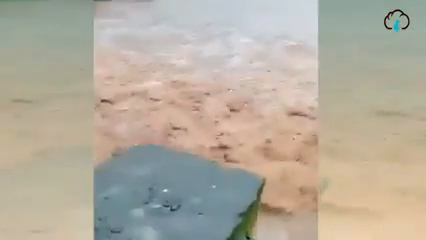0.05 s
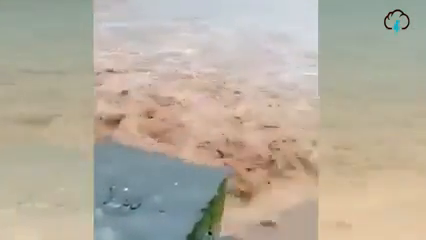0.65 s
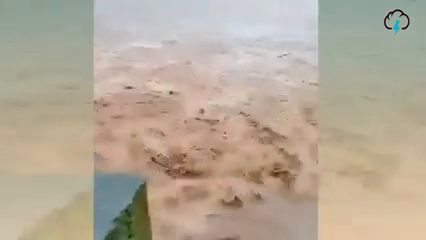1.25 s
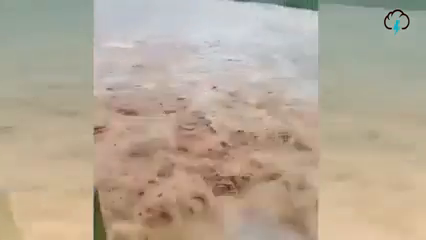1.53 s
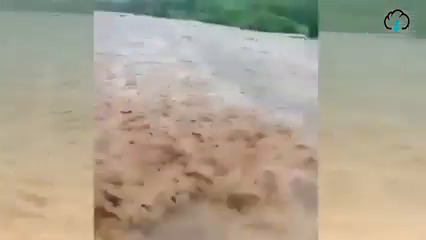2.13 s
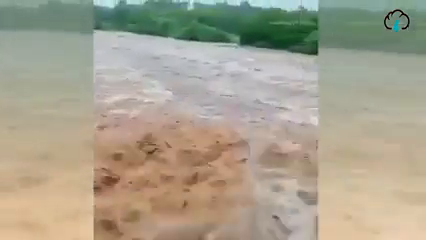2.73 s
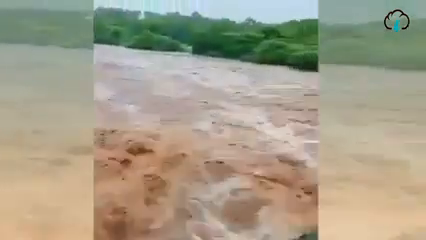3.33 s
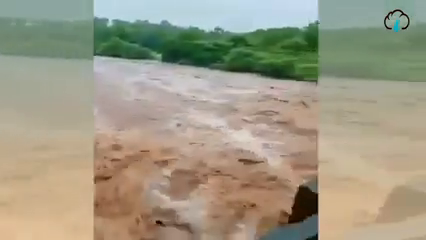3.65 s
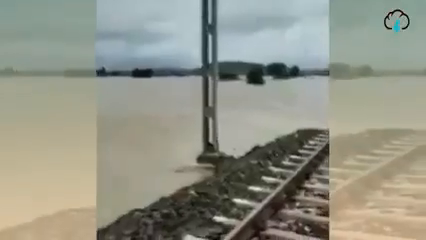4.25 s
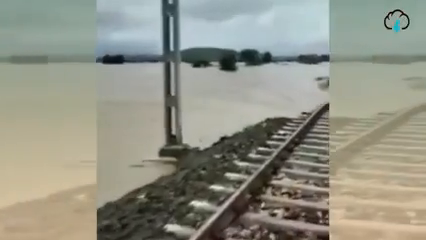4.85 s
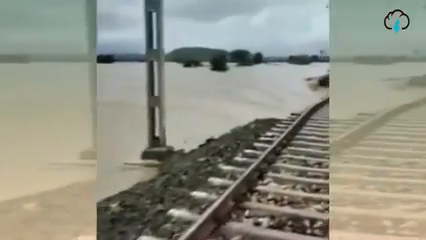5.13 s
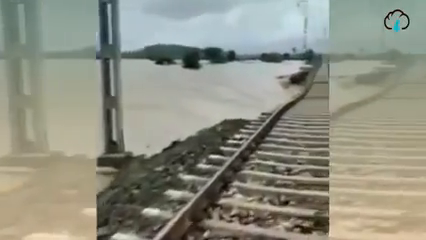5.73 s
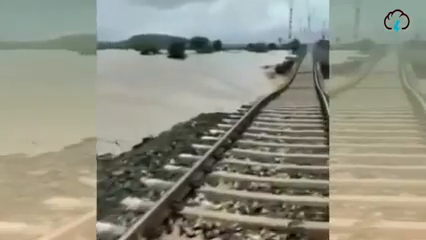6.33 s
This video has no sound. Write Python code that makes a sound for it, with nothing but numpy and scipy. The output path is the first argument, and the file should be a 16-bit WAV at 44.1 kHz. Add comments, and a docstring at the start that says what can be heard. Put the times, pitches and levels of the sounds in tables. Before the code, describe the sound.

Loud floodwater rushes nearby, surging and frothing as waves fold over and pockets of air gulp under. A little past halfway the roar breaks off into a brief hush with a faint hum. The rest is a quieter flooded plain: one sharp click of a stone, wind rumbling unevenly on the microphone under a flickering high hiss, and a few gentle laps of water.

```python
"""A river in flood tumbles over a drop close by: churning water, a bubbly wash, a bright hiss.
Waves fold over and air pockets gulp under. The roar breaks off into a short hush with a faint hum.
Then wind blows over a flooded plain beside a railway bank, buffeting the microphone;
small waves lap, and a ballast stone clicks once."""
import sys
import numpy as np
from scipy import signal
from scipy.fft import rfft, irfft, next_fast_len
from scipy.io import wavfile
from scipy.ndimage import uniform_filter1d, map_coordinates

SR = 44100
rng = np.random.default_rng(int(sys.argv[2]) if len(sys.argv) > 2 else 0)


def transcribe(u):
    """Save the signal u as a 16-bit wav file named by the first command-line argument.

    u: samples, shape (n,) or (channels, n), limited to [-1, 1]; the rate is SR.
    q: integer samples, one column per channel.
    """
    v = np.clip(np.atleast_2d(u).T, -1, 1)
    q = np.round(v * 32767).astype(np.int16)
    wavfile.write(sys.argv[1], SR, q)


N = 290619
TORRENT_END_S, WIND_START_S = 3.883, 4.04


def torrent():
    """Plunging water: churn, wash and bright hiss swell and surge together, then stop dead."""
    # torrent strength: time_s, level_db
    flow = [(0, -15), (1.5, -14.5), (1.75, -13), (2.0, -15), (2.8, -14), (3.0, -16), (3.1, -15), (3.3, -14),
            (3.42, -12.5), (3.54, -15.5), (3.88, -13)]
    mean_db, swell_db = swings(flow)
    surge = wobble(rate_hz=22)
    water = (amp(-3.5 + 0.89 * swell_db + 0.86 * surge) * churn()
             + amp(-4.5 + 0.44 * swell_db + 0.5 * surge) * wash()
             + amp(-13.5 + 0.1 * swell_db + 0.5 * surge) * bright_hiss()
             + sizzle() + hollow())
    past_s = np.maximum(clock() - TORRENT_END_S, 0)
    cutoff = np.where(past_s > 0, amp(-14 - 60 * past_s / 0.073), 1)  # faint, short trail
    return low_passed(water * amp(mean_db) * cutoff, top_hz=13200)


def churn():
    """The body of the water: low, lumpy noise and large bubbles."""
    # churn spectrum: freq_hz, gain_db
    colour = [(25, -27), (40, -18.5), (60, -10), (85, -1.5), (140, -6), (290, -2.5), (440, -4.5),
              (620, -13.5), (1200, -35.5)]
    boil = bubbles(count=2200, low_hz=112.7, high_hz=592, cycles=19.3, spread_db=1, rise=0.21)
    lumps = patchy(depth_db=1.6, width_hz=140, life_s=0.026) + amp(-11) * boil
    return coloured(evened(lumps, width_hz=150, span_s=.13), colour)


def wash():
    """Air folded into the water rings as a froth of small bubbles."""
    # wash spectrum: freq_hz, gain_db
    colour = [(250, -28), (450, 0), (700, 1), (900, -2), (1080, -2), (1450, -3.5), (2100, -3.5), (2700, -8),
              (3700, -8.5), (4400, -16.5), (5200, -43), (8000, -65)]
    froth = bubbles(count=4000, low_hz=694.3, high_hz=4447, cycles=170, spread_db=2, rise=0.046)
    foam = patchy(depth_db=3.5, width_hz=90, life_s=.04) + amp(-12.5) * froth
    return coloured(evened(foam, width_hz=840, span_s=.12), colour)


def bright_hiss():
    """A bright hiss that flickers in patches, wider in stereo than the low roar."""
    # bright hiss spectrum: freq_hz, gain_db
    colour = [(3000, -66), (4500, -4), (5200, -8.5), (6000, -0.5), (6800, 4.5), (7700, -0.5), (8800, -7.5),
              (11300, -7.5), (12800, -0.5), (13300, -11)]
    pair = [patchy(depth_db=4.5, width_hz=250, life_s=.022) for _ in range(2)]
    return coloured(widened(pair), colour)


def sizzle():
    """Brief sizzling swells in the treble hiss."""
    # swells, relative to the torrent: centre_s, level_db
    sizzles = [(.06, -22), (.37, -17), (.7, -26), (.85, -18), (1.44, -14), (1.61, -15.5), (1.88, -15),
               (2.11, -13), (2.24, -19), (2.68, -29), (2.93, -22), (3.33, -15), (3.58, -15), (3.82, -12.5)]
    # sizzle spectrum: freq_hz, gain_db
    colour = [(4500, -43), (5700, -1), (6300, -2), (6900, 8), (7600, -4), (8600, -12), (13000, -13)]
    pair = [patchy(depth_db=3, width_hz=150, life_s=0.031) for _ in range(2)]
    return swells(sizzles, half_s=0.04) * coloured(widened(pair), colour)


def sloshes():
    """Waves fold over in the torrent: short swells of noise, deep when large, bright when small."""
    # folding waves: centre_s, centre_hz, level_db
    folds = [(.1, 230, -21), (.23, 270, -21), (.36, 900, -22), (.76, 280, -19.5), (.85, 2000, -23.5),
             (1.04, 2000, -24), (1.14, 250, -21), (1.39, 2200, -22), (1.62, 900, -24), (1.66, 300, -19.5),
             (1.73, 2200, -21), (2.01, 2400, -23.5), (2.05, 900, -24), (2.31, 1500, -22.5),
             (2.53, 900, -23), (3.11, 2200, -22.5), (3.33, 2200, -23.5), (3.37, 700, -22.5),
             (3.44, 680, -21.5)]
    half_s, half_octaves = 0.042, 0.61
    out, t = np.zeros(N), clock()
    water = patchy(depth_db=4, width_hz=110, life_s=.03)
    for centre_s, centre_hz, level_db in folds:
        near = np.abs(t - centre_s) < .15
        hz = np.fft.rfftfreq(near.sum(), 1 / SR)
        band = np.exp(-(np.log2((hz + 1) / centre_hz) / half_octaves) ** 2 / 2)
        wave = unit(irfft(rfft(water[near]) * band, near.sum()))
        envelope = np.exp(-((t[near] - centre_s) / half_s) ** 2)
        out[near] += amp(level_db - 1) * envelope * wave
    return low_passed(out, top_hz=4400)


def gulps():
    """Large air pockets are pulled under: each swells, rings with rising pitch and fades."""
    # air pockets: peak_s, pitch_hz, peak_db
    pockets = [(.09, 183, -16), (.102, 274, -16), (.374, 1049, -22), (.424, 118, -17), (.496, 376, -19),
               (.705, 392, -19), (.816, 1065, -23), (.938, 425, -22), (1.12, 140, -19), (1.196, 1055, -21),
               (1.251, 1082, -22), (1.652, 317, -17), (1.904, 608, -20), (2.177, 328, -20),
               (2.252, 188, -16), (2.351, 150, -15), (2.496, 689, -22), (2.563, 279, -13.5),
               (2.769, 328, -19), (3.204, 215, -11.5), (3.306, 242, -16), (3.355, 732, -19),
               (3.413, 807, -21), (3.434, 134, -18), (3.736, 134, -19), (3.779, 436, -17)]
    return throbs(pockets, rise_s=.016, fall_s=.022, glide=.6)


def hollow():
    """Water rings hollow beside a concrete block, fading as the microphone turns away."""
    centre_hz, half_width_hz = 1055, 64
    end_s, fade_s = 1.74, 0.33
    ring = filtered(rng.standard_normal(N), lambda hz: 1 / (1 + ((hz - centre_hz) / half_width_hz) ** 2))
    return amp(-17.5) * unit(ring) * np.clip((end_s - clock()) / fade_s, 0, 1)


def wind():
    """Gusts buffet the microphone and lift the rush; rush and hiss slowly rise."""
    # wind strength: time_s, level_db
    strength = [(4.06, -26.5), (4.2, -26.5), (4.4, -29), (4.58, -26), (4.75, -30.5), (4.9, -28.5),
                (5.3, -28), (5.47, -27), (5.68, -31), (5.85, -27), (6.1, -27.5), (6.19, -24.5), (6.32, -28),
                (6.59, -28)]
    # buffet spectrum: freq_hz, gain_db
    buffet_colour = [(10, -31), (22, -3.5), (50, 0), (95, 1.5), (135, -5.5), (250, -42), (1000, -100)]
    # faint airy top: freq_hz, gain_db
    air_colour = [(9000, -40), (10000, -1), (13000, -3), (14300, -6), (15500, 2)]
    mean_db, gust_db = swings(strength)
    t, eddies = clock(), wobble(rate_hz=28)
    freshen_db = 0.32 * (t - (WIND_START_S + t[-1]) / 2)
    buffet_db = mean_db - 7 + 2 * gust_db + 1.7 * eddies
    near = amp(buffet_db) * coloured(rng.standard_normal(N), buffet_colour) + thumps()
    far = amp(2 + 0.34 * gust_db + 0.3 * eddies) * rush() + burbling_hiss()
    air = amp(-72) * coloured(rng.standard_normal(N), air_colour)
    onset = np.clip((t - WIND_START_S) / 0.008 + .5, 0, 1)
    return (near + air + amp(mean_db + freshen_db) * far) * onset


def thumps():
    """Eddies strike the microphone."""
    # strikes: peak_s, pitch_hz, peak_db
    strikes = [(5.402, 37, -27), (5.445, 285, -26), (5.48, 45, -28), (5.584, 183, -25), (6.179, 166, -25),
               (6.188, 53, -21), (6.191, 290, -25), (6.237, 113, -26)]
    return throbs(strikes, rise_s=0.021, fall_s=0.021, glide=0)


def rush():
    """Wind rushes low over open water; the level dips briefly in patches."""
    # rush spectrum: freq_hz, gain_db
    colour = [(70, -24), (130, -9), (165, -0.5), (250, -1), (335, -2.5), (385, -7), (520, -12), (700, -12),
              (1200, -13.5), (1500, -15.5), (2050, -18.5), (2300, -22), (2550, -46), (3200, -75),
              (8000, -110)]
    noise = patchy(depth_db=7, width_hz=70, life_s=.05, ceiling=.1, size=2048)
    return coloured(evened(noise, width_hz=350, span_s=.3), colour)


def burbling_hiss():
    """A burbling, flickering high hiss and a shrill band."""
    # hiss spectrum: freq_hz, gain_db
    hiss_colour = [(1500, -21), (2600, -1.5), (4100, 0), (5200, -5), (6500, -1), (8300, -3), (9000, -9.5),
                   (9800, -37), (10600, -27.5), (11500, -20), (13000, -38)]
    # shrill band: freq_hz, gain_db
    shrill_colour = [(5800, -47), (6800, -4.5), (7300, 1), (7750, 2.5), (8100, -13), (8800, -52),
                     (10000, -100)]
    burble = patchy(depth_db=16, width_hz=80, life_s=.04, ceiling=.75, size=2048)
    burble = evened(burble, width_hz=2500, span_s=.12)
    glitter = patchy(depth_db=11, width_hz=50, life_s=.05, ceiling=1, size=2048)
    return amp(-12) * coloured(burble, hiss_colour) + amp(-13) * coloured(glitter, shrill_colour)


def stone():
    """A ballast stone shifts and knocks: short modes and a gritty scrape in one hollow colour."""
    # contacts: start_s, level_db
    contacts = [(4.115, -19), (4.124, -22), (4.131, -15.5), (4.137, -19), (4.1411, -4.5), (4.1432, -19),
                (4.147, -18)]
    # stone modes: pitch_hz, level_db, t60_s
    modes = [(1550, -10, .006), (2020, 2, .009), (2480, -6, .022), (3550, -10, .016), (4100, -2, .0055),
             (6450, -13, .005), (7250, -20, .01)]
    # knock spectrum: freq_hz, gain_db
    colour = [(600, -15), (1500, 0), (2600, 0), (2900, -20), (3400, -1), (4400, 0), (5200, -9), (6300, -2),
              (7600, -1), (9500, -45), (13000, -70)]
    out, t = np.zeros(N), np.arange(SR // 8) / SR
    for start_s, level_db in contacts:
        ring = sum(amp(mode_db + rng.normal(0, 1) - 60 * t / t60_s) * np.sin(2 * np.pi * hz * t)
                   for hz, mode_db, t60_s in modes)
        grit = rng.standard_normal(len(t)) * amp(-10.5 - 60 * t / .11)
        out[round(start_s * SR):][:len(t)] += amp(level_db - 5.5) * (ring + grit)
    return filtered(out, lambda hz: amp(along(colour, hz)))


def laps():
    """Small waves lap at the bank, each a soft gurgle of bubbles."""
    # waves: centre_s, level_db
    waves = [(4.83, -31.5), (5.23, -32), (5.36, -35), (5.56, -32.5), (6.0, -32), (6.25, -33)]
    gurgle = bubbles(count=3000, low_hz=490, high_hz=1990, cycles=40, spread_db=-2, rise=0.091)
    soft = filtered(gurgle, lambda hz: amp(along([(2000, 0), (2800, -50)], hz)))
    return swells(waves, half_s=0.043) * soft


def hush():
    """A faint hum and murmur of air between torrent and wind."""
    # hum partials: pitch_hz, rms_db
    partials = [(97, -56), (194, -63)]
    # murmur spectrum: freq_hz, gain_db
    colour = [(50, -10), (110, -15), (400, -18), (900, -15), (2300, -20), (2700, -34), (8000, -49),
              (12000, -79)]
    t = clock()
    hum = sum(amp(db) * np.sqrt(2) * np.sin(2 * np.pi * hz * t) for hz, db in partials)
    air = coloured(rng.standard_normal(N) + amp(6) * rng.standard_normal((2, N)), colour)
    return (hum + amp(-54) * air) * ((t > TORRENT_END_S) & (t < WIND_START_S))


def bubbles(count, low_hz, high_hz, cycles, spread_db, rise):
    """Bubble cloud at rms 1: each decays 60 dB over `cycles`, its pitch rising as it nears the surface."""
    when, pitch, size, phase = rng.random((count, 4)).T[:, :, None]
    hz = low_hz * (high_hz / low_hz) ** pitch
    k = np.arange(min(int(cycles * SR / low_hz), 2000))
    turns = hz * k / SR
    age = turns / cycles
    tone = np.sin(2 * np.pi * (turns * (1 + rise * age / 2) + phase))
    envelope = np.exp(-np.log(1000) * age) * (1 - np.exp(-2 * turns))
    size_db = -spread_db * np.log(np.maximum(1 - size, .004))  # spread > 0: a few much louder
    gain = amp(size_db) * np.sqrt(hz / low_hz)
    index = (when * N).astype(int) + k
    return unit(np.bincount(index.ravel(), (gain * tone * envelope).ravel(), N)[:N])


def throbs(rows, rise_s, fall_s, glide):
    """Short tones that swell and fade; glide > 0 bends them upward."""
    out, t = np.zeros(N), clock()
    for peak_s, hz, peak_db in rows:
        near = np.abs(t - peak_s) < .1
        lag_s = t[near] - peak_s
        tone = np.sin(2 * np.pi * (hz * lag_s * (1 + glide * lag_s) + rng.random()))
        envelope = np.exp(-(lag_s / np.where(lag_s < 0, rise_s, fall_s)) ** 2)
        out[near] += amp(peak_db) * envelope * tone
    return out


def patchy(depth_db, width_hz, life_s, ceiling=1.56, size=1024):
    """White noise whose gain drifts in time-frequency patches; a low ceiling leaves mostly dips."""
    frames = dict(nperseg=size, noverlap=size - size // 4)
    hz, t, z = signal.stft(rng.standard_normal(N), SR, **frames)
    knots = rng.standard_normal((512, 512))
    grid = np.meshgrid(hz / width_hz, t / life_s, indexing="ij")
    gain = amp(depth_db * np.minimum(map_coordinates(knots, grid, mode="mirror"), ceiling))
    return unit(signal.istft(z * gain, **frames)[1][:N])


def evened(x, width_hz, span_s, size=2048):
    """x with its power held level: short lumps stay, long swells go."""
    frames = dict(nperseg=size, noverlap=size - size // 4)
    hz, t, z = signal.stft(x, SR, **frames)
    power = uniform_filter1d(np.abs(z) ** 2, max(round(width_hz / hz[1]), 1), axis=0)
    power = np.abs(uniform_filter1d(power, max(round(span_s / t[1]), 1), axis=1)) + 1e-20
    gain = np.sqrt(power.mean(axis=1, keepdims=True) / power)
    return unit(signal.istft(z * gain, **frames)[1][:N])


def widened(pair):
    """Two independent noises mixed to a partly alike left and right."""
    # left-right likeness: freq_hz, correlation
    likeness = [(4000, .8), (5500, .45), (7000, .4), (9000, .7), (13000, .68)]
    angle = lambda hz: np.arccos(np.clip(along(likeness, hz), -1, 1)) / 2
    mid, side = filtered(np.array(pair), lambda hz: np.array([np.cos(angle(hz)), np.sin(angle(hz))]))
    return np.array([mid + side, mid - side])


def swings(rows):
    """Mean of a (time_s, level_db) curve, and its swing about that mean per sample."""
    time_s, level_db = np.transpose(rows)
    t = clock()
    curve_db = np.interp(t, time_s, level_db)
    mean_db = curve_db[(t >= time_s[0]) & (t <= time_s[-1])].mean()
    return mean_db, curve_db - mean_db


def swells(rows, half_s):
    """Gain of a train of Gaussian swells."""
    t = clock()
    return sum(amp(db) * np.exp(-((t - centre_s) / half_s) ** 2) for centre_s, db in rows)


def wobble(rate_hz):
    """Smooth random curve with knots at rate_hz."""
    return map_coordinates(rng.standard_normal(int(N * rate_hz / SR) + 4), [clock() * rate_hz])


def filtered(x, response):
    """x through the frequency response response(hz)."""
    size = next_fast_len(N + 8192)
    return irfft(rfft(x, size) * response(np.fft.rfftfreq(size, 1 / SR)), size)[..., :N]


def coloured(x, colour):
    """x shaped by (freq_hz, gain_db) points, at rms 1."""
    return unit(filtered(x, lambda hz: amp(along(colour, hz))))


def low_passed(x, top_hz):
    """Steep low-pass with a 300 Hz wide edge."""
    return filtered(x, lambda hz: np.clip((top_hz - hz) / 300 + .5, 0, 1))


def along(points, hz):
    """(freq_hz, value) points read on a log axis."""
    freq_hz, values = np.transpose(points)
    return np.interp(np.log(hz + 1), np.log(freq_hz), values)


def amp(db):
    """Decibels to gain."""
    return 10 ** (np.asarray(db) / 20)


def unit(x):
    """x at rms 1."""
    return x / np.sqrt(np.mean(x ** 2) + 1e-20)


def clock():
    """Sample times in seconds."""
    return np.arange(N) / SR


def scene():
    """The torrent, the hush, then the windy plain."""
    return torrent() + sloshes() + gulps() + hush() + wind() + laps() + stone()


def record(dry):
    """Soft clip of the highest peaks, then a steep low-pass."""
    rounded = dry / (1 + np.abs(dry / 1.05) ** 16) ** (1 / 16)
    return low_passed(rounded, top_hz=15700)


dry = scene()
out = record(dry)
transcribe(out)
```